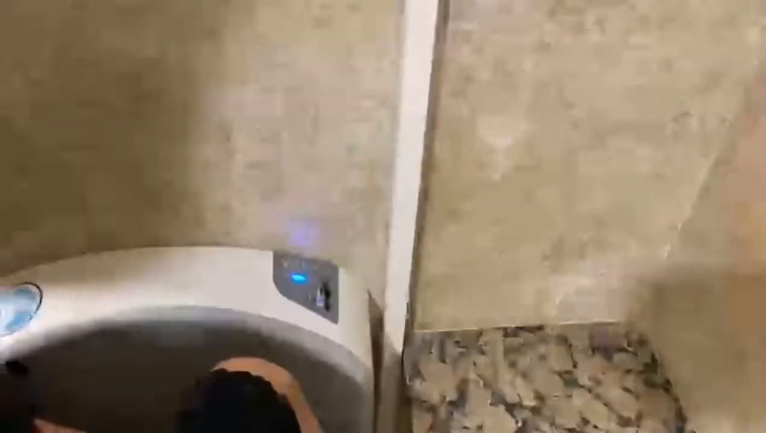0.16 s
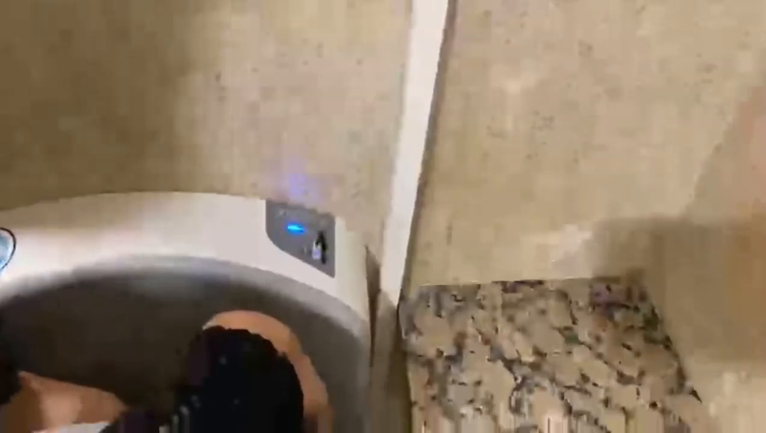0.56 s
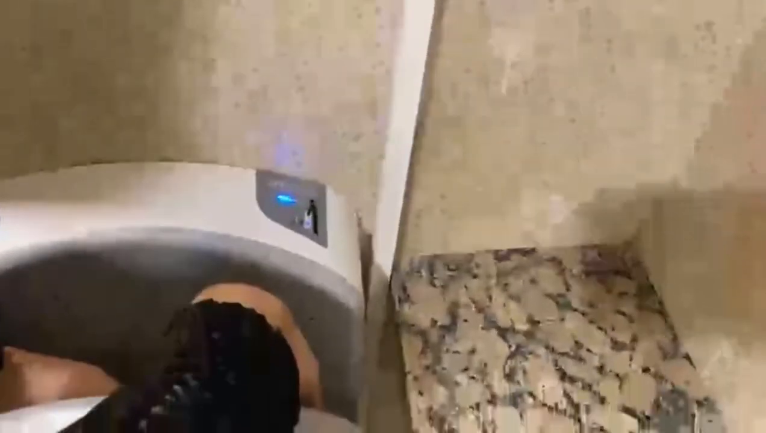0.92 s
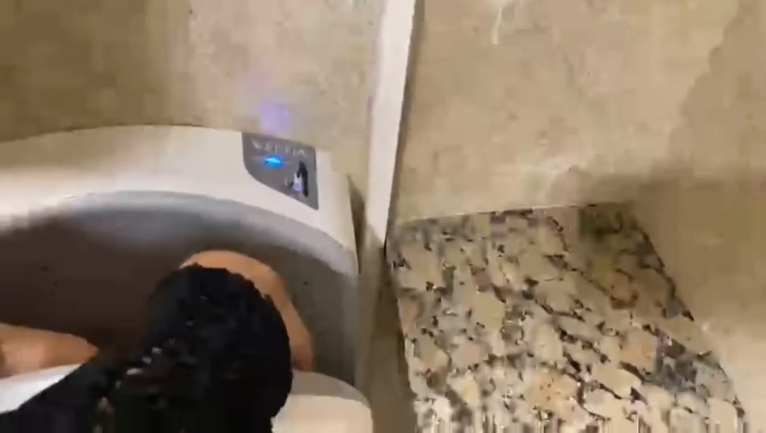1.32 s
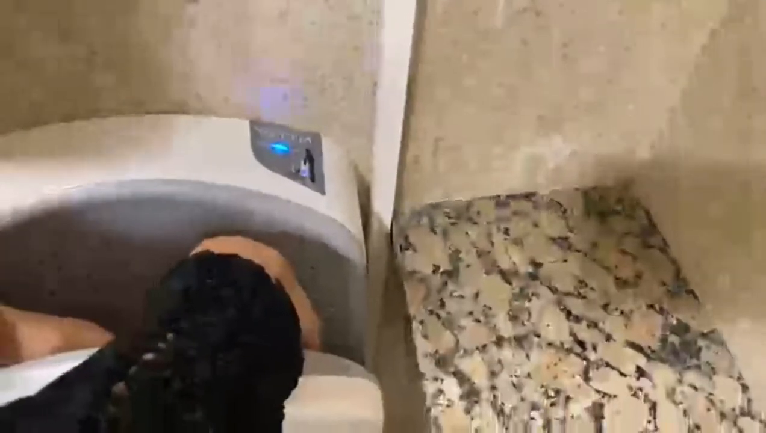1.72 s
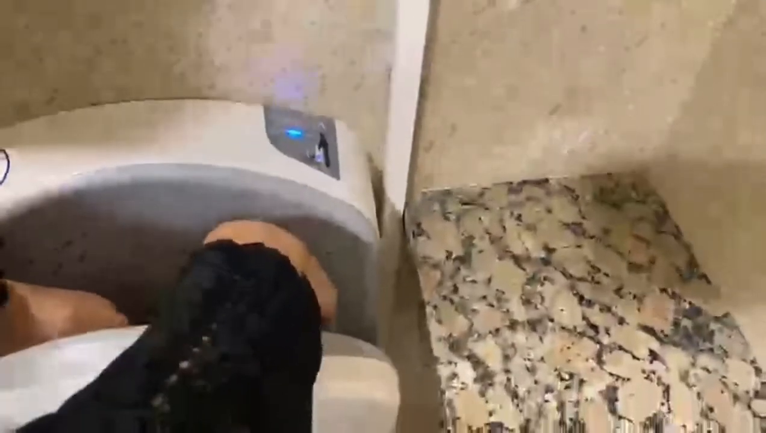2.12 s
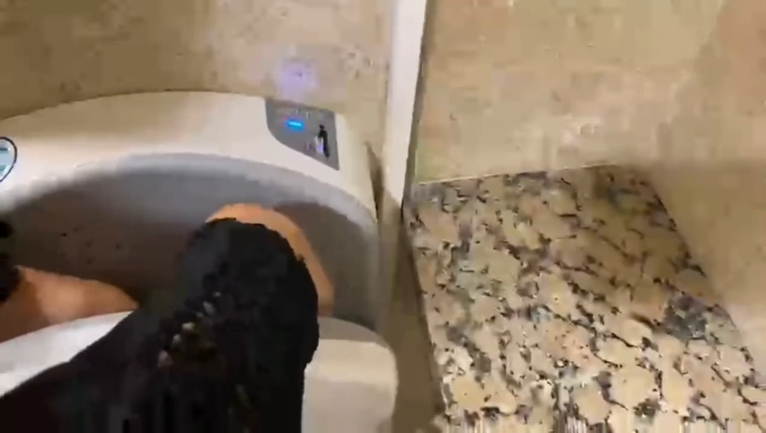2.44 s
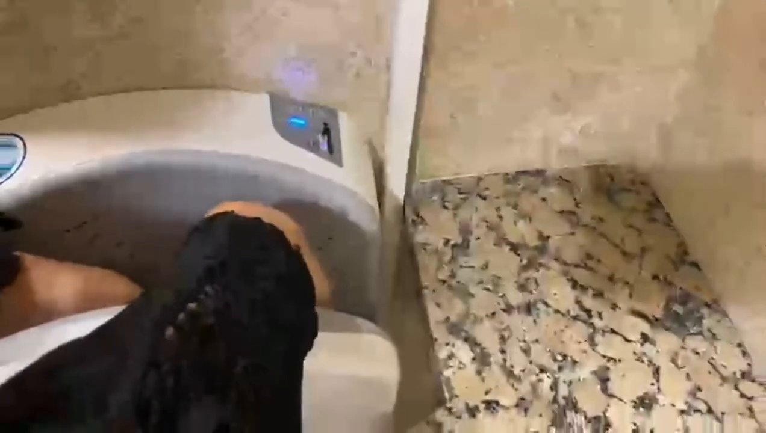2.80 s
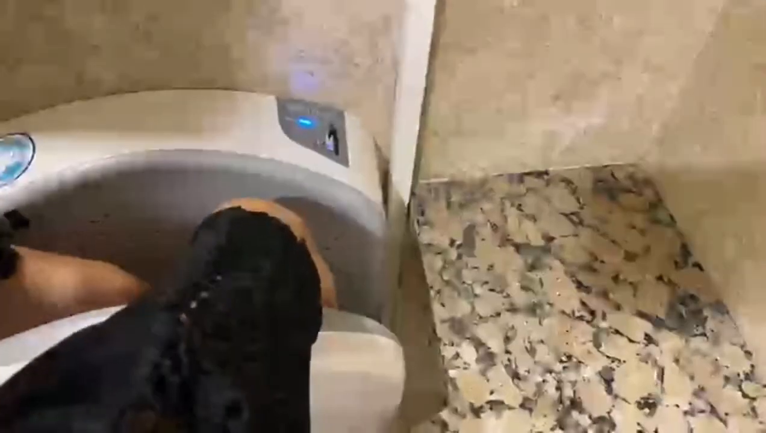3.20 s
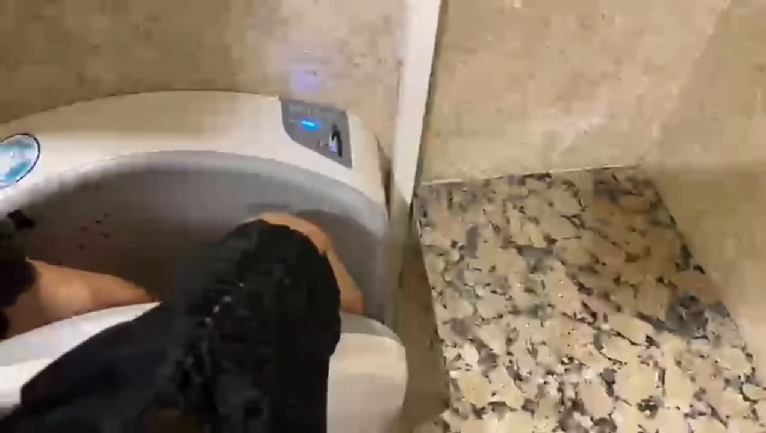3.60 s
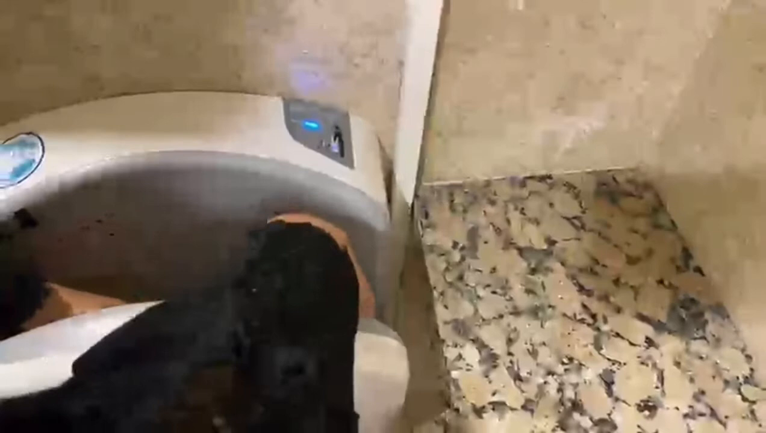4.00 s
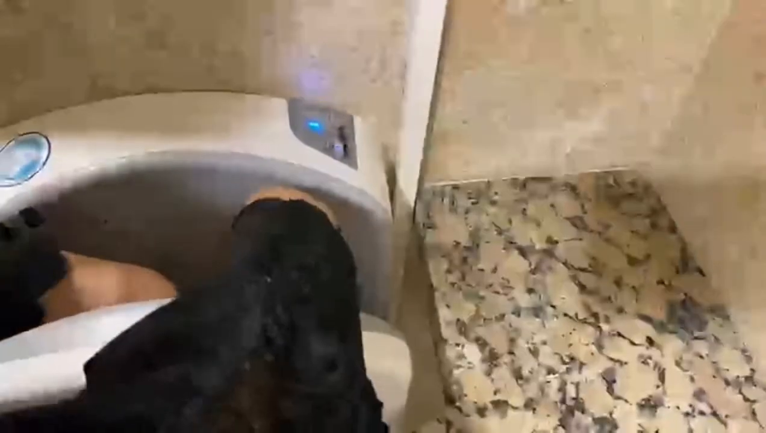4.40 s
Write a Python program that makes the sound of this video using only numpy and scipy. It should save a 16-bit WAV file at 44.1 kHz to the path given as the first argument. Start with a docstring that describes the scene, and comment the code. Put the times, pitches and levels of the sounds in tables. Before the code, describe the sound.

A high-speed hand dryer runs at full power throughout, very close to the microphone in a small tiled restroom. Bright, wide hiss of air breaking on hands dominates, over a hollow trough roar and low room rumble. A faint motor hum beats quickly underneath, and a thin whine comes and goes.

```python
"""A hands-in dryer at full speed in a small tiled restroom, heard close to the microphone, in stereo.
Thin air jets break on the hands: noise shaped into a wide hiss that flutters a little.
The airflow roars in the dryer's trough and stirs the room's low modes: noise with resonances.
Underneath, two motors hum as sines at nearly the same shaft rate and beat; a fan whines at nine times that rate."""
import sys
import numpy as np
from scipy import signal
from scipy.fft import rfft, irfft, next_fast_len
from scipy.io import wavfile
from scipy.ndimage import uniform_filter1d, map_coordinates

SR = 44100
rng = np.random.default_rng(int(sys.argv[2]) if len(sys.argv) > 2 else 0)


def log_audio(samples):
    """Write samples as a 16-bit WAV file to the path given in sys.argv[1]."""
    # one column per channel
    frames = np.atleast_2d(samples).T
    # limit to full scale, then quantise
    limited = np.clip(frames, -1, 1)
    pcm = np.round(limited * 32767).astype(np.int16)
    wavfile.write(sys.argv[1], SR, pcm)


N = 200655

# the fan's whine comes and goes: time_s, level_db
WHINE_LEVEL = [(0, -46), (.45, -41), (.8, -33.5), (1.0, -35.5), (1.15, -33.5), (1.33, -42), (1.55, -34.5),
               (1.97, -30.8), (2.1, -37), (2.3, -33), (2.66, -28.7), (2.92, -29.8), (3.15, -36),
               (3.35, -34.3), (3.5, -42), (3.75, -37), (4.0, -30.3), (4.2, -46), (4.55, -35.5)]
# the hum rises and sinks: time_s, level_db
HUM_LEVEL = [(0, -30), (.7, -27.3), (1.35, -29.3), (2.0, -28), (2.95, -26.6), (3.45, -30), (4.0, -27.5),
             (4.55, -28.2)]
BLADES = 9
# the motor hunts gently about its running speed: mean (Hz), swing (Hz), period (s), a moment of top speed (s)
SHAFT_HZ, HUNT_HZ, HUNT_PERIOD_S, FASTEST_S = 481.28, .36, 1.74, .68
BEAT_HZ, SECOND_HUM_DB = 6.8, -10.5  # the second motor runs this much slower and hums this much softer
HUM_WAVER_DB, WHINE_WAVER_DB = .2, .9  # how far each tone wavers

# low modes of the room: centre_hz, width_hz, relative_db
ROOM_MODES = [(43.4, 3.7, -25), (101.7, 9.2, 5.5), (103, 6.6, -9), (123, 6.6, 4), (151.3, 4.4, 5),
              (166.4, 6.1, -2.5), (182.5, 8, 4.5), (204.3, 16, 2), (219, 7.8, -2), (241, 9.4, -7)]
# turbulence between the room modes: frequency_hz, relative_db
RUMBLE_SPECTRUM = [(10, -22), (32, -16), (48, -8), (80, -2.5), (140, -4), (260, -1), (315, -19.5),
                   (400, -89)]
# stereo width of the rumble: frequency_hz, side_minus_mid_db
RUMBLE_SIDE = [(25, -45), (70, -25), (110, -40), (200, -35), (235, -27), (275, -13)]
# level of the low rumble: time_s, level_db
RUMBLE_LEVEL = [(0, -22), (.8, -21.5), (1.65, -23), (1.9, -21.5), (2.4, -22.5), (3.05, -22.5),
                (3.85, -24.5), (4.55, -24)]
# bass and the band near 250 Hz, against the rest of the rumble: time_s, gain_db
BASS_LEVEL = [(0, -3.5), (.6, -3), (1, -0.5), (1.8, -2.5), (2.3, -4.5), (3.35, 1.5), (3.9, -0.5),
              (4.55, 0.5)]
UPPER_RUMBLE_LEVEL = [(0, 2), (1.15, 2.5), (1.6, 0.5), (2.4, -1.5), (3.2, 1), (4.1, -1.5), (4.55, -1)]
# brief rises in level of the low rumble: peak_s, length_s, gain_db
RUMBLE_RISES = [(.5, 0.12, 2), (.76, 0.14, 2), (1.01, 0.16, 1.5), (1.82, 0.12, 1.5), (2.61, 0.13, 1.5),
                (3.08, 0.52, 1.5), (3.53, .15, 2), (4.12, 0.33, 3)]
RISE_HZ, RISE_OCTAVES = 183, 1.35  # centre and width of the band that rises

# resonances of the trough and housing: centre_hz, width_hz, relative_db
TROUGH_MODES = [(357, 12, -4), (388, 14.6, 1.6), (405, 12, -4), (424, 11, -2.5), (508.7, 19, 1.8),
                (564, 13, -2.5), (604, 13, -2.5), (622, 18, -2.5), (710, 85, -12), (850, 12, -23),
                (878, 23, -6.5), (1004, 26, -9), (1064, 39, -8.5), (1225, 42, -10), (1370, 25, -9.5),
                (1590, 34, -11.5), (1722, 26, -11.5), (1826, 16, -13)]
# turbulence between those resonances: frequency_hz, relative_db
ROAR_SPECTRUM = [(200, -91), (290, -7), (370, -8.5), (450, -8), (560, -5), (700, -10), (820, -11.5),
                 (1100, -12.5), (1500, -33), (3000, -103)]
# left-right likeness of the roar: frequency_hz, likeness (-1 to 1)
ROAR_ALIKE = [(270, 0.94), (350, 0.15), (390, 0.62), (445, 0.077), (510, 0.45), (570, 0.14), (640, 0.091),
              (1000, 0.26)]
# stereo balance of the roar: frequency_hz, left_minus_right_db
ROAR_BALANCE = [(300, -2.5), (360, 4.5), (410, -6), (490, 0.5), (620, 3.5), (850, 5), (1100, -1)]
# level of the roar: time_s, level_db
ROAR_LEVEL = [(0, -21), (.85, -21), (1.4, -19.5), (2.4, -20.5), (3.6, -19.5), (4.1, -20), (4.55, -18.5)]
# band near 427 Hz against the rest of the roar: time_s, gain_db
LOW_ROAR_LEVEL = [(0, 5.5), (.2, 2.5), (.7, 0), (1.4, -2), (2.8, 0), (3.8, -0.3), (4.55, -1.5)]
BUFFET_RATE, LOW_BUFFET_DB, HIGH_BUFFET_DB = 24, .45, 1.1  # changes per second, depths in dB

# spectrum of the air jets: frequency_hz, relative_db
JET_SPECTRUM = [(300, -64), (800, -7.5), (1150, -9), (1450, -5.5), (2100, -0.5), (2900, -0.7), (3600, 0),
                (4100, -3), (4700, -1.5), (6000, -1.5), (7300, 0), (8500, -0.5), (9400, -5.3), (10100, 2.5),
                (10400, -2.1), (10950, 0.7), (11300, -2.5), (11620, -2.5), (11850, -36)]
# the narrow gap around the hands colours the hiss: centre_hz, width_hz, relative_db
GAP_MODES = [(1970, 24, -5.5), (2360, 55, -4), (2590, 35, -2), (3040, 35, -2), (4450, 71, -5)]
# the hiss is wide in the mids, mostly centred higher up: frequency_hz, likeness (-1 to 1)
JET_ALIKE = [(700, 0), (1250, .3), (1450, .05), (2000, -.1), (2700, .1), (3300, .65), (3750, .87),
             (4150, .98), (4400, .8), (5600, .38), (6050, .48), (6350, .997), (7520, 1), (7680, .55),
             (8200, .5), (8330, 1), (9580, 1), (9720, .57), (10270, .6), (10380, .995)]
# left-right phase of the hiss: frequency_hz, left_lag_degrees
JET_LAG = [(7530, 0), (7700, 45), (8200, 120), (8330, 180), (9580, 180), (9720, 240), (10270, 295),
           (10380, 360)]
# stereo balance of the hiss: frequency_hz, left_minus_right_db
JET_BALANCE = [(800, 4.1), (1300, -0.1), (2000, -0.2), (2800, 4.1), (4000, 0.2), (5400, 1.7), (6400, 0)]
# how far eddies swell and thin the hiss: frequency_hz, depth_db
EDDY_DEPTH = [(1200, 1.15), (4000, .9), (8000, .72)]
# level of the hiss: time_s, level_db
HISS_LEVEL = [(0, -15), (.45, -14.5), (1.1, -15), (1.85, -14.5), (3.1, -14.5), (3.5, -15), (3.9, -14.5),
              (4.2, -15), (4.55, -15.5)]
# bands near 1.6, 3.3 and 5.9 kHz against the rest of the hiss: time_s, gain_db
LOW_HISS_LEVEL = [(0, 1), (.9, -0.78), (1.3, 0.68), (1.9, -.5), (3.4, 0.48), (3.8, 0.58), (4.55, -1.8)]
MID_HISS_LEVEL = [(0, 0.94), (.7, -0.47), (1.3, 0.65), (2.35, -0.78), (3.1, 0.37), (3.9, 0), (4.55, 0.77)]
UPPER_HISS_LEVEL = [(0, 0.7), (1.2, 0), (2.4, -0.3), (3.4, 1), (3.9, -1.5), (4.3, -1.5), (4.55, 0)]
# the hiss dips briefly: lowest_s, length_s, gain_db
LULLS = [(.945, 0.049, -1), (1.30, 0.072, -1), (1.64, 0.16, -1.2), (2.147, 0.08, -1.5), (2.29, .04, -1.5),
         (2.71, 0.041, -2), (3.633, 0.037, -0.5), (4.28, .09, -.5)]

# the moving hands put narrow ridges and notches into the air noise
HISS_COMB_DB, ROAR_COMB_DB = 1.9, 1.25
NOTCH_BIAS = .16  # notches run deeper than ridges stand high
CEILING, TOP_HZ = .88, 11880  # recorder: peaks round off near this share of full scale; band limit


def amp(db):
    """Decibels to gain."""
    return 10 ** (np.asarray(db) / 20)


def unit(x):
    """Scale to rms 1."""
    return x / np.sqrt(np.mean(x ** 2) + 1e-20)


def along(points, hz):
    """(Hz, value) points read on a log frequency axis."""
    f, v = np.transpose(points)
    return np.interp(np.log(hz + 1), np.log(f + 1), v)


def curve(points):
    """(s, value) points read at every sample."""
    s, v = np.transpose(points)
    return np.interp(np.arange(N) / SR, s, v)


def wobble(rate):
    """A smooth random curve, rate knots a second."""
    knots = rng.standard_normal(int(N * rate / SR) + 4)
    return map_coordinates(knots, [np.arange(N) * rate / SR])


def bumps(rows):
    """A level in dB made of smooth brief bumps, one for each (peak s, length s, dB)."""
    t = np.arange(N) / SR
    return sum(db * np.exp(-(2 * (t - s) / length) ** 2) for s, length, db in rows)


def filtered(x, response):
    """x times a response of frequency."""
    size = next_fast_len(N + SR // 2)
    hz = np.fft.rfftfreq(size, 1 / SR)
    return irfft(rfft(x, size) * response(hz), size)[..., :N]


def band(x, centre_hz, octaves):
    """One band of x, octaves wide."""
    return filtered(x, lambda hz: 1 / (1 + np.abs(2 * np.log2((hz + 1) / centre_hz) / octaves) ** 6))


def swelling(x, centre_hz, level, octaves):
    """Let one band of x, octaves wide, follow a curve of (s, dB)."""
    return x + (amp(curve(level)) - 1) * band(x, centre_hz, octaves)


def resonant(base, modes, hz):
    """Gain of a broad spectrum with resonances standing on it; their powers add."""
    peaks = sum(amp(db) ** 2 / (1 + ((hz - centre) / width) ** 2 * 2) ** 2 for centre, width, db in modes)
    return np.sqrt(amp(along(base, hz)) ** 2 + peaks)


def spread(pair, alike, balance):
    """Mix two unrelated noises into left and right with a likeness and a balance at each frequency."""
    def mid_side_gains(hz):
        turn = np.arccos(np.clip(along(alike, hz), -1, 1)) / 2
        return np.array([np.cos(turn), np.sin(turn)])

    mid, side = filtered(pair, mid_side_gains)
    stereo = np.array([mid + side, mid - side])
    return filtered(stereo, lambda hz: amp(np.outer([.5, -.5], along(balance, hz))))


def combed(x, depth_db, order=5):
    """Reflections off the moving hands: ridges and notches, about 100 Hz wide, lasting a fifth of a second."""
    z = signal.stft(x, nperseg=2048)[2]
    field = rng.standard_normal(z.shape[1:])
    field = uniform_filter1d(uniform_filter1d(field, order, 0), 2 * order, 1)
    field -= uniform_filter1d(field, 4 * order, 0)  # each ridge lies next to a notch: the broad level stays
    comb = unit(field) - NOTCH_BIAS * unit(field) ** 2
    return unit(signal.istft(z * amp(depth_db * comb), nperseg=2048)[1][:, :N])


def motor():
    """Each rotor's unbalance hums once a turn, and the two hums beat; the fan blades whine as they pass."""
    t = np.arange(N) / SR
    hunt = np.cos(2 * np.pi * (t - FASTEST_S) / HUNT_PERIOD_S)
    shaft_hz = SHAFT_HZ + HUNT_HZ * hunt
    angle = 2 * np.pi * np.cumsum(shaft_hz + .15 * wobble(20)) / SR
    # standing waves: the hum differs in level and phase from left to right, the whine in phase
    phase = angle + np.array([[.3], [-.3]])
    rotors = np.sin(phase) + amp(SECOND_HUM_DB) * np.sin(phase - 2 * np.pi * BEAT_HZ * t)
    hum = amp([[2.3], [-2.3]]) * rotors
    whine = np.sin(BLADES * angle + np.array([[.52], [-.52]]))
    hum_db = curve(HUM_LEVEL) + HUM_WAVER_DB * wobble(15)
    whine_db = curve(WHINE_LEVEL) + WHINE_WAVER_DB * wobble(8.6)
    return np.sqrt(2) * (amp(hum_db) * hum + amp(whine_db) * whine)


def rumble():
    """The airflow stirs the room's low modes, almost alike on both sides; the level rises briefly at times."""
    noise = rng.standard_normal((2, N))
    mid, side = filtered(noise, lambda hz: resonant(RUMBLE_SPECTRUM, ROOM_MODES, hz))
    side = filtered(side, lambda hz: amp(along(RUMBLE_SIDE, hz)))
    air = unit(np.array([mid + side, mid - side]))
    air = swelling(air, 91, BASS_LEVEL, octaves=1.35)
    air = swelling(air, 250, UPPER_RUMBLE_LEVEL, octaves=0.43)
    return air + (amp(bumps(RUMBLE_RISES)) - 1) * band(air, RISE_HZ, RISE_OCTAVES)


def roar():
    """Turbulence rings the trough that the hands are in; its upper part buffets harder than its lower part."""
    noise = rng.standard_normal((2, N))
    air = filtered(noise, lambda hz: resonant(ROAR_SPECTRUM, TROUGH_MODES, hz))
    air = unit(spread(combed(air, ROAR_COMB_DB), ROAR_ALIKE, ROAR_BALANCE))
    air = swelling(air, 427, LOW_ROAR_LEVEL, octaves=0.66)
    low = filtered(air, lambda hz: 1 / (1 + (hz / 750) ** 6))
    buffet = wobble(BUFFET_RATE)
    return low * amp(LOW_BUFFET_DB * buffet) + (air - low) * amp(HIGH_BUFFET_DB * buffet)


def tiles(x, wet_db, t60, below_hz):
    """Hard walls add a dense answer, which combs the mids into fine fixed ridges; the treble arrives direct."""
    t = np.arange(SR // 2) / SR
    tail = rng.standard_normal((2, len(t))) * amp(-60 * t / t60)
    tail /= np.linalg.norm(tail, axis=1, keepdims=True)
    running = np.pad(x, ((0, 0), (len(t) - 1, 0)), mode="wrap")  # the room is already full of sound
    answer = signal.fftconvolve(running, tail, mode="valid", axes=1)
    return x + amp(wet_db) * filtered(answer, lambda hz: 1 / (1 + (hz / below_hz) ** 3))


def eddies(order=6):
    """Two unrelated noises that swell and sink together in patches of some 35 ms by 1.5 kHz."""
    hz, _, z = signal.stft(rng.standard_normal((2, N)), SR, nperseg=512)
    field = rng.standard_normal(z.shape[1:])
    field = uniform_filter1d(uniform_filter1d(field, 3 * order, 0), order, 1)
    field -= uniform_filter1d(field, 2 * order, 1)  # eddies are brief: the mean flow stays steady
    swell_db = along(EDDY_DEPTH, hz)[:, None] * unit(field)
    return signal.istft(z * amp(swell_db), nperseg=512)[1][:, :N]


def jets():
    """Sheets of air break on the hands: a broad hiss that flutters a little; the walls answer its lower part."""
    air = unit(eddies())
    ridges = combed(air, HISS_COMB_DB) - air
    air = air + filtered(ridges, lambda hz: 1 / (1 + (hz / 7000) ** 6))  # the top stays smooth
    air = filtered(air, lambda hz: resonant(JET_SPECTRUM, GAP_MODES, hz))
    air = tiles(air, wet_db=-5, t60=0.35, below_hz=2100)
    air = unit(spread(air, JET_ALIKE, JET_BALANCE))
    # half of the lag goes to each channel
    air = filtered(air, lambda hz: np.exp(1j * np.radians(np.outer([-.5, .5], along(JET_LAG, hz)))))
    air = swelling(air, 1560, LOW_HISS_LEVEL, octaves=1.2)
    air = swelling(air, 3300, MID_HISS_LEVEL, octaves=0.72)
    air = swelling(air, 5900, UPPER_HISS_LEVEL, octaves=0.2)
    flutter_db = .25 * wobble(30)
    return air * amp(flutter_db + bumps(LULLS))


def scene():
    """Air noise in three registers over the tones of the motors."""
    low_air = amp(curve(RUMBLE_LEVEL)) * rumble()
    trough_air = amp(curve(ROAR_LEVEL)) * roar()
    hiss = amp(curve(HISS_LEVEL)) * jets()
    return low_air + trough_air + hiss + motor()


def record(dry):
    """The recorder rounds off the rare highest peaks and keeps nothing above its band limit."""
    rounded = dry / (1 + np.abs(dry / CEILING) ** 10) ** (1 / 10)
    return filtered(rounded, lambda hz: hz < TOP_HZ)


dry = scene()
out = record(dry)
log_audio(out)
```